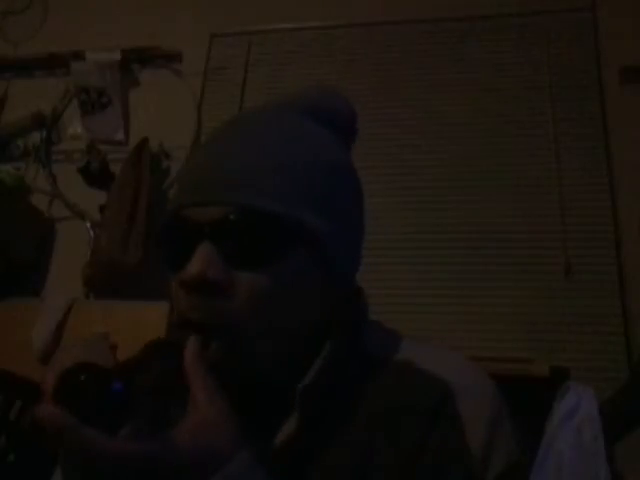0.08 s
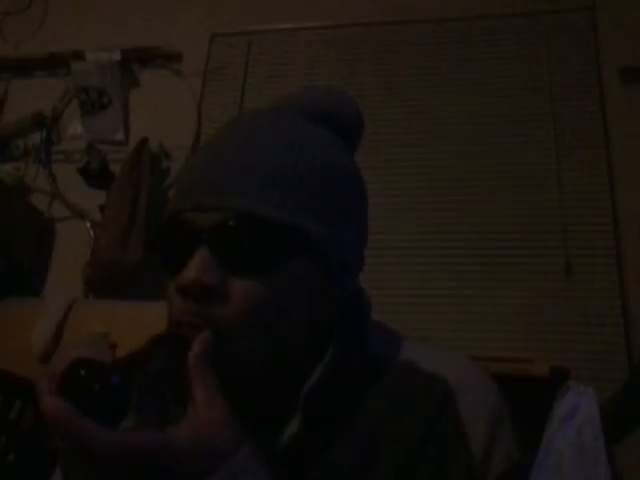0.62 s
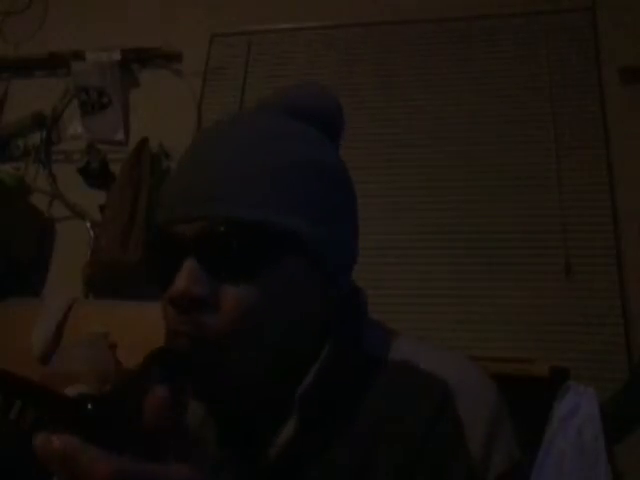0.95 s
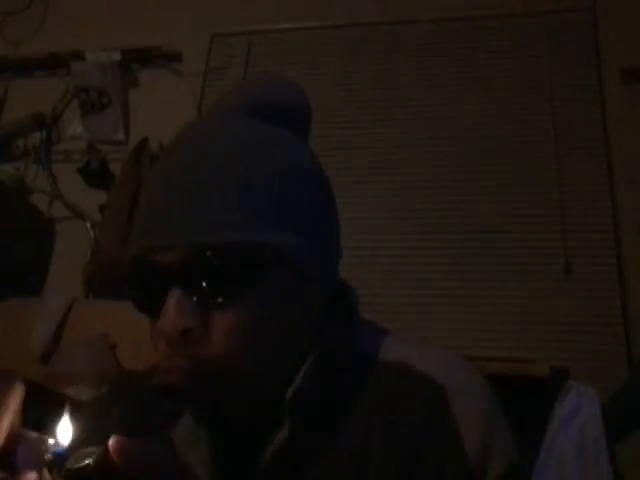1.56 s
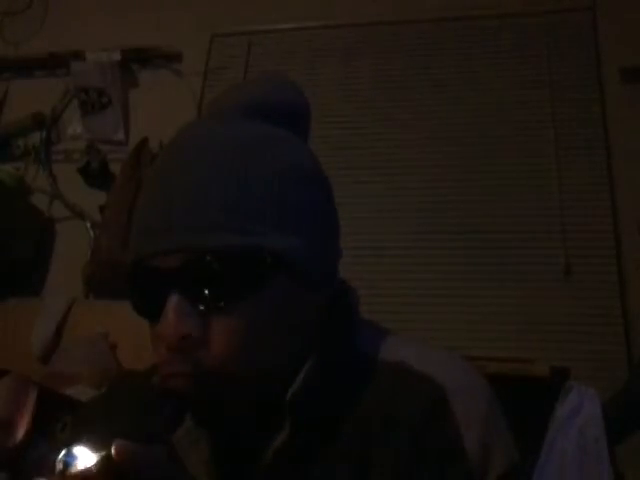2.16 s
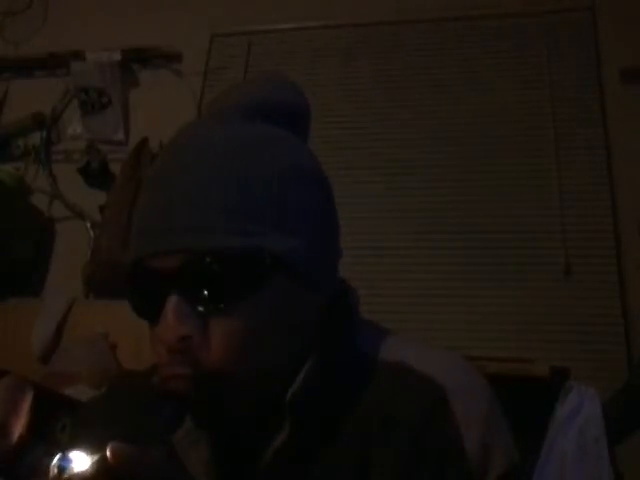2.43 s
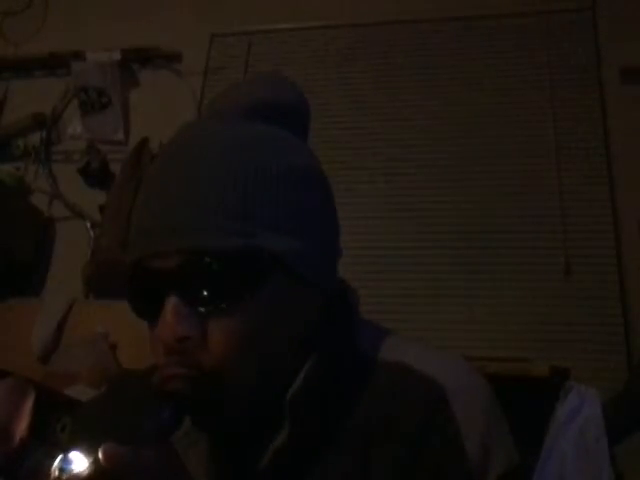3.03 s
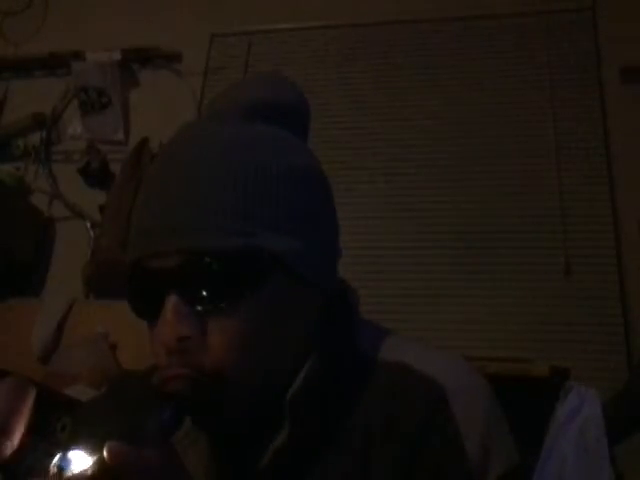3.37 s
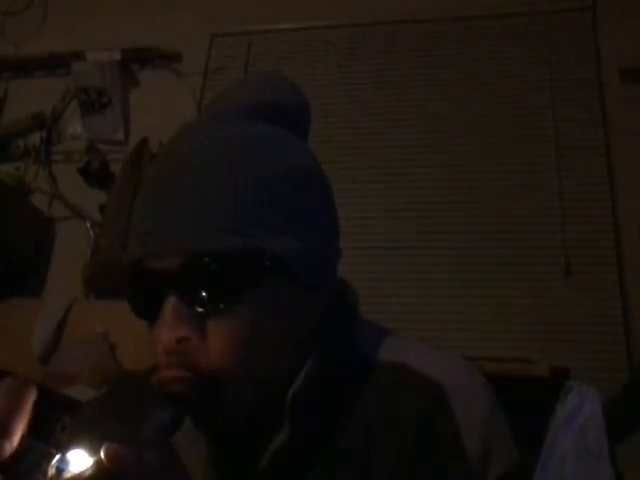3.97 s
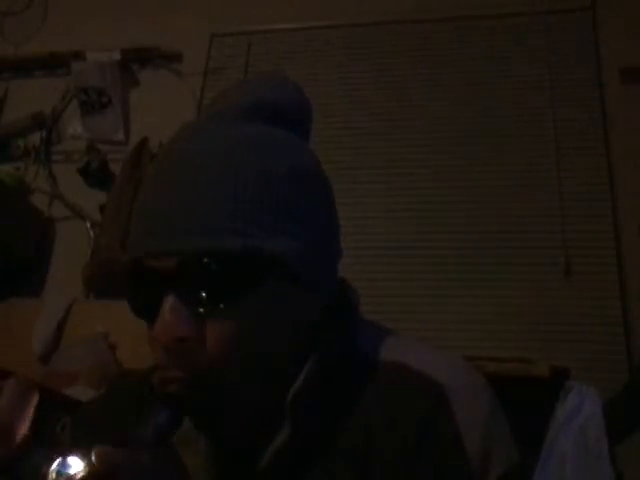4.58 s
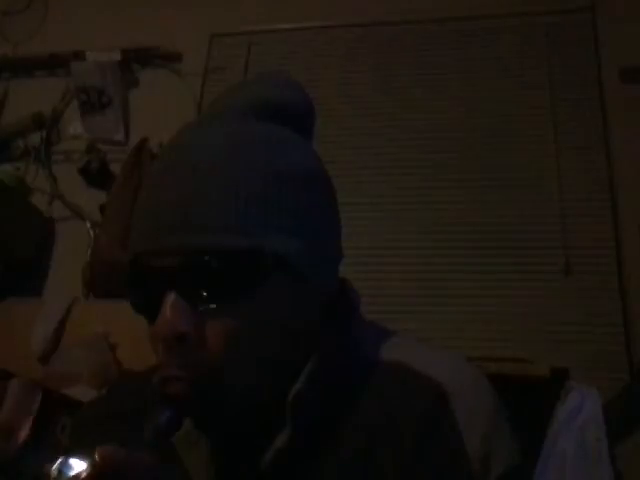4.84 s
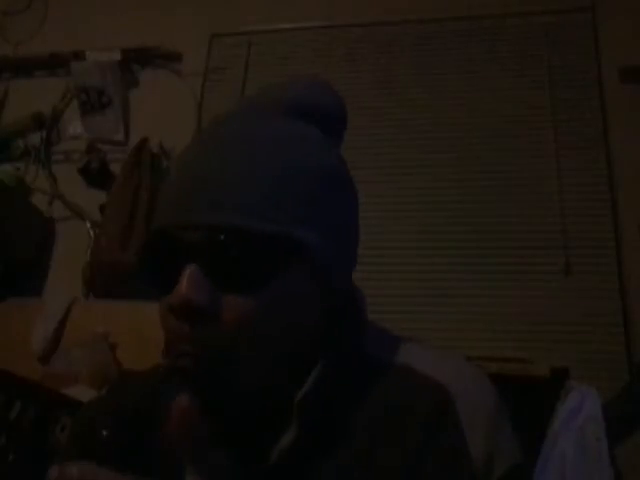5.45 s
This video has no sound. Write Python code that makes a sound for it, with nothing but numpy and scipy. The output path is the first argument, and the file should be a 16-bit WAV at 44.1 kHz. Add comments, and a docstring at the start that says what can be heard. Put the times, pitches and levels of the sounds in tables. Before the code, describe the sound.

Close by, one flint lighter strike is followed by a bright, growing crackle of a burning pipe over faint room rumble.

```python
"""In a small quiet room, someone lights a pipe. A flint wheel rasps, the lighter clicks, and the
gas catches with a puff and rushes into the bowl. Air squeaks in the mouthpiece, then the filling
sizzles and pops ever harder as tiny pockets of moisture burst. Fingers tap, a sleeve rustles and the
room rumbles faintly. Two small microphone ports listen close by; the right one rings in the treble."""
import sys
import numpy as np
from scipy import signal
from scipy.fft import rfft, irfft, next_fast_len
from scipy.io import wavfile
from scipy.ndimage import map_coordinates

SR = 44100
rng = np.random.default_rng(int(sys.argv[2]) if len(sys.argv) > 2 else 0)


def to_wav(s):
    """Save 16-bit WAV."""
    ch = np.atleast_2d(s).T  # columns
    pcm = np.round(np.clip(ch, -1, 1) * 32767)  # PCM
    wavfile.write(sys.argv[1], SR, pcm.astype(np.int16))


N = 247401


# the loudest pops of the burning filling: (time [s], level [dB], added level for the body [dB])
LOUD_POPS = [(2.0106, -30, -6.5), (2.4542, -24.5, -8), (2.4794, -22.5, -9.5), (2.6282, -18.5, -11.5),
             (2.6979, -21.5, -5.5), (2.7807, -20, -3), (2.8202, -24, -8), (2.9815, -13.5, -23),
             (2.997, -14.5, -9), (3.112, -15.5, -2), (3.1367, -22.5, -8.5), (3.2122, -14, 0),
             (3.4053, -18, -10), (3.4929, -20, -17), (3.5278, -16, -23), (3.6288, -17, -11),
             (3.7913, -14.5, -17.5), (3.8232, -14, -12.5), (3.8694, -8, -15), (3.9587, -15, -12),
             (4.0046, -14, -40), (4.048, -16.5, -8), (4.0677, -12.5, -8.5), (4.0968, -15, -14),
             (4.1225, -16, -32), (4.1447, -12, -28), (4.1727, -19.5, -6), (4.2348, -11, -14.5),
             (4.277, -19.5, -4), (4.3354, -13, -17), (4.3767, -8.5, -39), (4.448, -11.5, -16),
             (4.4784, -23.5, -1.5), (4.582, -13.5, -23), (4.6041, -10, -26), (4.6195, -18, -32),
             (4.64, -1.5, -26), (4.6562, -7, -16), (4.6724, -16, -19), (4.6896, -25, -11),
             (4.7105, -15.5, -8), (4.7438, -20, -4), (4.749, -21.5, 3), (4.7728, -9.5, 0),
             (4.7842, 0.5, -33), (4.8077, -20, -3), (4.8244, -13, -0.5), (4.8566, -8.5, -19),
             (4.899, -14.5, -8.5), (4.9859, -28, -1), (5.0137, -19.5, -40), (5.0594, -19, -30),
             (5.0731, -12.5, -16), (5.1019, -16, -36), (5.1211, -13.5, -42), (5.1796, -11.5, -38),
             (5.217, -15, -35), (5.33, -17, -42), (5.3788, -2, -40), (5.3883, -13, -40),
             (5.4408, -7.5, -39), (5.4423, -8, -52), (5.4503, -7.5, -45), (5.4737, -5.5, -53),
             (5.5141, -12.5, -17), (5.536, -10, -51)]
# a bright snap's colour, or how strong each frequency is: (frequency [Hz], level [dB])
SNAP_COLOUR = [(100, -15.5), (900, -22), (2000, -15), (3000, -3), (4200, -2.5), (6200, 4), (7300, 1.5),
               (8500, -9.5), (10500, -29.5), (12500, -23), (15000, -29.5)]
# the duller body of a pop: (frequency [Hz], level [dB])
BODY_COLOUR = [(100, -47), (600, -8), (1200, -1), (1900, 1.5), (3000, 7), (4500, 7), (7000, 4),
               (15000, -60)]
def pops(snap_db=-11, body_db=-1, ring_db=-3, ring_hz=3400, splutter_db=-21):
    """Pockets of moisture burst: a snap, a duller body with its own pitch, and a brief splutter."""
    times, db, low_db = np.vstack([LOUD_POPS, small_pops()]).T
    snaps = kicks_at(times, amp(db + snap_db))
    splutter = amp(splutter_db) * fading(snaps, seconds=.0013) * grains(rate=6000, spread_db=2)
    body = struck(kicks_at(times, amp(db + low_db + body_db)), BODY_COLOUR)
    pitch = ring_hz * 2 ** (rng.random(len(times)) - .5)
    ring = rings(times, amp(db + low_db + ring_db), pitch, cycles=0.76)
    return struck(snaps + splutter, SNAP_COLOUR) + body + ring


def small_pops(over_burn_db=14, spread_db=5, moist_body_db=-14, dry_body_db=-32, count=90):
    """Random rows like LOUD_POPS, most where the burn is strong; drying takes their body away."""
    burn_db = burn()
    when, strength, body = rng.random((count, 3)).T
    chance = np.cumsum(amp(burn_db / 2))
    samples = np.searchsorted(chance / chance[-1], (np.arange(count) + when) / count)
    times = samples / SR
    db = burn_db[samples] + over_burn_db + spread_db * (2 * strength - 1)
    low_db = moist_body_db + (dry_body_db - moist_body_db) * dryness(times)
    return np.column_stack([times, db, low_db + spread_db * (2 * body - 1)])


def sizzle(fizz_db=-15, tick_db=-15.5, flurry_db=1.5, count=3200, moist_hz=4070, dry_hz=6100):
    """Countless tiny bursts fizz and tick with the burn; the ticks get higher once the filling dries."""
    fizz = grains(rate=1000, spread_db=5)
    when, strength, cavity = rng.random((count, 3)).T
    times = when * N / SR
    pitch = (moist_hz + (dry_hz - moist_hz) * dryness(times)) * 2 ** (cavity - .5)
    ticks = rings(times, amp(-20 * strength), pitch, cycles=0.56)
    # bursts this small give off little bass, so both take the colour of a snap
    crackle = amp(fizz_db) * unit(struck(fizz, SNAP_COLOUR))
    crackle += amp(tick_db) * unit(struck(ticks, SNAP_COLOUR))
    return amp(burn() + flurry_db * wobble(35)) * crackle


# how hard the filling burns: (time [s], level [dB])
BURN_LEVELS = [(1.3, -79), (2.05, -55), (2.92, -49.5), (3.38, -47.5), (3.72, -40), (4.3, -40), (4.9, -37),
               (5.2, -38.5), (5.45, -43.5), (5.61, -62)]
# fresh patches catch and flare up: (time [s], length [s], boost [dB])
FLARE_UPS = [(2.357, .12, 3.5), (2.682, .12, 6), (3.195, .08, 7), (4.4, .09, 5.5), (4.657, .16, 8)]
def burn(rise_s=.015, fall_s=0.055):
    """The strength of the burn in dB: it builds slowly, flares now and then, and dies down."""
    steady_db, = curves(BURN_LEVELS)
    return steady_db + sum(db * swell(start, length, rise_s, fall_s) for start, length, db in FLARE_UPS)


def dryness(times, dry_at_s=4.9, drying_s=0.043):
    """0 while the filling is moist, 1 once it has dried."""
    return (1 + np.tanh((times - dry_at_s) / drying_s)) / 2


# wetter pockets in the filling: (time [s], length [s], level [dB])
WET_POCKETS = [(2.446, 0.0014, -51), (2.7806, 0.0012, -39), (2.82, 0.0015, -36.5), (2.829, 0.0012, -43),
               (2.987, 0.0135, -41), (3.2128, .003, -37), (3.4953, 0.0057, -40), (4.076, 0.0047, -38),
               (4.689, 0.0046, -32.5)]
def splutters(body_db=2, edge_s=0.0013):
    """A wet pocket bursts in a quick run of tiny pops, part snap and part body."""
    level = sum(amp(db) * swell(start, length, edge_s, edge_s) for start, length, db in WET_POCKETS)
    bursts = grains(rate=4000, spread_db=2)
    snap = unit(struck(bursts, SNAP_COLOUR))
    body = amp(body_db) * unit(struck(bursts, BODY_COLOUR))
    return level * unit(snap + body)


# the thumb pushes the wheel, first a slip, then a full spin: (time of top speed [s], level [dB])
WHEEL_SPINS = [(1.138, -56), (1.186, -32)]
# the wheel and lever snap home, and at last the lever is let go: (time [s], level [dB])
LIGHTER_CLICKS = [(1.1825, -9), (1.1839, -7), (1.1871, -15.5), (1.1979, -22), (5.5165, -36)]
# the colour of the lighter's rasp and clicks: (frequency [Hz], level [dB])
FLINT_COLOUR = [(60, -55.5), (450, -22), (900, -17.5), (1500, -14.5), (2200, -8), (3400, -5), (5300, 1.5),
                (6500, -3.5), (8500, -6), (10500, -20.5), (13500, -9.5), (15800, -14.5)]
def lighter(click_db=-2, chatter_db=-9, chatter_s=0.00087, rise_db_per_s=854.5, fall_db_per_s=750.5):
    """The wheel's teeth rasp over the flint, harder and harder, until the thumb lands on the lever."""
    t = np.arange(N) / SR
    grip = sum(amp(db + np.minimum(rise_db_per_s * (t - fastest), fall_db_per_s * (fastest - t)))
               for fastest, db in WHEEL_SPINS)
    teeth = unit(struck(grains(rate=7000, spread_db=3), FLINT_COLOUR))
    times, db = np.transpose(LIGHTER_CLICKS)
    clicks = kicks_at(times, amp(db + click_db))
    chatter = amp(chatter_db) * fading(clicks, chatter_s) * rng.choice([-1, 1], N)
    return grip * teeth + struck(clicks + chatter, FLINT_COLOUR) + hood(clicks)


def hood(clicks, pitch_hz=5410, level_db=-19.5, decay_s=.003):
    """The lighter's thin steel hood rings briefly after each click."""
    t = np.arange(SR // 10) / SR
    ring = np.sin(2 * np.pi * pitch_hz * t) * np.exp(-t / decay_s)
    return amp(level_db) * signal.fftconvolve(clicks, ring)[:N]


# the low rush of the flame: (frequency [Hz], level [dB])
RUSH_COLOUR = [(20, -47), (90, -26), (150, 2), (250, 0), (500, -6), (1000, -9.5), (2500, -10), (8000, -47)]
# the high hiss of the gas jet: (frequency [Hz], level [dB])
JET_COLOUR = [(3000, -38), (6500, -3), (8000, 1), (9200, -7.5), (10500, -4.5), (14500, -9)]
def flame(lit_s=1.183, puff_db=-51, idle_db=-69, draw_db=-54, build_s=6.95, jet_db=-3.5):
    """The gas lights with a puff, then rushes and hisses ever more as it is pulled into the bowl."""
    age = np.maximum(np.arange(N) / SR - lit_s, 0)
    puff = amp(puff_db) * swell(lit_s, hold_s=0.022, rise_s=0.036, fall_s=0.084)
    rush = amp(idle_db) * (age > 0) + amp(draw_db) * (1 - np.exp(-age / build_s))
    return np.array([(puff + rush) * noise(RUSH_COLOUR) + amp(jet_db) * rush * noise(JET_COLOUR)
                     for port in range(2)])


# squeaks in the mouthpiece:
# (time [s], length [s], level [dB], first pitch [Hz], top pitch [Hz], time to climb [s])
AIR_SQUEAKS = [(1.694, 0.022, -60, 2850, 3450, 0.0093), (1.777, 0.047, -54, 2870, 3225, 0.047)]
# the tones that make up a squeak: (multiple of the pitch [x], level [dB])
SQUEAK_TONES = [(1, -7), (2, -8)]
def squeaks(rasp_db=-10, edge_s=0.029, sag_hz_per_s=13000, flutter_s=0.013, flutter_db=1.5):
    """Air slips through a narrow gap at the mouthpiece and sings; the pitch climbs, then sags."""
    t, out = np.arange(N) / SR, np.zeros(N)
    for start, length, db, first_hz, top_hz, climb_s in AIR_SQUEAKS:
        since_top = t - start - climb_s
        hz = top_hz + np.minimum((top_hz - first_hz) * since_top / climb_s, -sag_hz_per_s * since_top)
        phase = 2 * np.pi * np.cumsum(hz * (1 + .018 * wobble(900))) / SR
        tone = sum(amp(level + 3.7 * wobble(120)) * np.sin(k * phase) for k, level in SQUEAK_TONES)
        # near the top pitch, every other cycle weakens
        flutter = amp(flutter_db) * np.exp(-(since_top / flutter_s) ** 2)
        tone = tone * (1 + flutter * np.cos(phase / 2)) + amp(rasp_db) * noise(SNAP_COLOUR)
        out += tone * amp(db) * swell(start, length, edge_s, edge_s)
    return out


# light touches on the pipe and lighter: (time [s], level [dB])
FINGER_TAPS = [(0.03, -37), (0.066, -36), (1.467, -49), (1.716, -44), (1.74, -48), (1.778, -45),
               (1.831, -36)]
def taps(level_db=-10):
    """Fingers make small soft scuffs as the hands settle."""
    times, db = np.transpose(FINGER_TAPS)
    return fading(kicks_at(times, amp(db + level_db)), seconds=.002) * noise(SNAP_COLOUR)


# the colour of brushing cloth: (frequency [Hz], level [dB])
CLOTH_COLOUR = [(40, -1), (150, 9), (500, 5.5), (1200, -2), (2600, -2.5), (4000, -8), (6000, -7),
                (9000, -8.5), (15000, -18.5)]
def sleeve(level_db=-58):
    """A sleeve brushes softly and comes to rest."""
    return amp(level_db) * swell(0, hold_s=0.029, rise_s=0.029, fall_s=0.17) * noise(CLOTH_COLOUR)


# the colour of the room's rumble: (frequency [Hz], level [dB])
RUMBLE_COLOUR = [(20, -7.5), (60, -7.5), (120, -1), (170, -8.5), (250, -11), (500, -18), (1000, -21),
                 (2300, -36), (3700, -36.5), (5600, -31.5), (9000, -28)]
# how the rumble wavers: (time [s], level change [dB])
RUMBLE_DRIFT = [(0, 4), (2.6, 1.5), (3.7, 2), (4.7, -1.5), (5.61, 3.5)]
def room_tone(shared_db=-63, separate_db=-65, alike_hz=600):
    """The room rumbles faintly; only its long, low waves are alike at both ports."""
    drift_db, = curves(RUMBLE_DRIFT)
    shared = filtered(noise(RUMBLE_COLOUR), lambda hz: 1 / (1 + (hz / alike_hz) ** 2))
    separate = np.array([noise(RUMBLE_COLOUR), noise(RUMBLE_COLOUR)])
    return amp(drift_db) * (amp(shared_db) * shared + amp(separate_db) * separate)


# how long the room's echo lasts: (frequency [Hz], time to fade by 60 dB [s])
ECHO_TIMES = [(200, .3), (1500, .28), (5000, .29), (14000, .24)]
def room(x, onset_s=0.00088):
    """The walls send a short wash of echoes to each port; the highest treble dies first."""
    hz, t, spectrum = signal.stft(rng.standard_normal((2, SR // 2)), SR, nperseg=256)
    fade = amp(-60 * t / along(ECHO_TIMES, hz)[:, None])
    tail = signal.istft(spectrum * fade, SR, nperseg=256)[1]
    tail *= 1 - np.exp(-np.arange(tail.shape[1]) / SR / onset_s)
    return signal.fftconvolve(x[None], tail / np.linalg.norm(tail[0]), axes=1)[:, :N]


def amp(db):
    """Turns decibels into a number to multiply by."""
    return 10 ** (np.asarray(db) / 20)


def unit(x):
    """Scales x to an average strength (rms) of 1."""
    return x / np.sqrt(np.mean(x ** 2) + 1e-20)


def along(points, hz):
    """Reads between the rows of a frequency table, with octaves evenly spaced."""
    frequencies, values = np.transpose(points)
    return np.interp(np.log(hz + 1), np.log(frequencies), values)


def curves(rows):
    """One value per sample for each column after the time."""
    times, *columns = np.transpose(rows)
    return [np.interp(np.arange(N) / SR, times, column) for column in columns]


def wobble(rate):
    """A smooth curve through `rate` random points a second."""
    return map_coordinates(rng.standard_normal(int(N * rate / SR) + 4), [np.arange(N) * rate / SR])


def swell(start, hold_s, rise_s, fall_s):
    """A loudness curve that reaches 1 at start, holds, and falls back to 0."""
    t = np.arange(N) / SR - start
    return np.clip(np.minimum(1 + t / rise_s, 1 - (t - hold_s) / fall_s), 0, 1)


def fading(kicks, seconds):
    """A loudness curve that dies away after each kick."""
    return signal.lfilter([1], [1, -np.exp(-1 / (seconds * SR))], kicks)


def filtered(x, response):
    """Multiplies each frequency in x by response(hz)."""
    size = next_fast_len(N + SR // 2)
    return irfft(rfft(x, size) * response(np.fft.rfftfreq(size, 1 / SR)), size)[..., :N]


def delayed(x, seconds):
    """x arriving later."""
    return filtered(x, lambda hz: np.exp(-2j * np.pi * hz * seconds))


def noise(colour):
    """Noise of this colour, at strength 1."""
    return unit(filtered(rng.standard_normal(N), lambda hz: amp(along(colour, hz))))


def pulse(colour, size=1024):
    """The shortest click that has this colour."""
    cepstrum = irfft(np.log(amp(along(colour, np.fft.rfftfreq(size, 1 / SR)))))
    # folding the second half onto the first packs the energy at the start
    cepstrum[1:size // 2] *= 2
    cepstrum[size // 2 + 1:] = 0
    return irfft(np.exp(rfft(cepstrum)))


def struck(kicks, colour):
    """Every kick becomes a coloured click of the same height."""
    shape = pulse(colour)
    return signal.fftconvolve(kicks, shape / np.abs(shape).max())[:N]


def kicks_at(times, sizes):
    """Kicks, spikes one sample long, at the given times."""
    return np.bincount(np.round(np.asarray(times) * SR).astype(int), sizes, N)[:N]


def grains(rate, spread_db):
    """Uneven kicks at random moments, about `rate` a second, at strength 1."""
    size = amp(spread_db * np.clip(rng.standard_normal(N), -2, 2))
    return unit((rng.random(N) < rate / SR) * size * rng.choice([-1, 1], N))


def rings(times, sizes, hz, cycles, size=256):
    """Each burst rings its own small hollow for a few cycles."""
    turns = hz[:, None] * np.arange(size) / SR
    envelope = np.exp(-turns / cycles) * (1 - np.exp(-2 * turns))
    waves = sizes[:, None] * np.sin(2 * np.pi * turns) * envelope
    where = np.round(times * SR).astype(int)[:, None] + np.arange(size)
    return np.bincount(where.ravel(), waves.ravel(), N)[:N]


def gain_control(x, limit_db=-5, release_db_per_s=45, attack_s=0.021):
    """A peak over the limit pulls the volume down a moment later; it then creeps back."""
    over_db = np.maximum(20 * np.log10(np.abs(x).max(0) + 1e-9) - limit_db, 0)
    ramp_db = release_db_per_s * np.arange(N) / SR
    held_db = np.maximum.accumulate(over_db + ramp_db) - ramp_db
    return x * amp(-fading(held_db, attack_s) / (attack_s * SR))


# how strongly the lighter throws its sound out into the room: (frequency [Hz], boost [dB])
LIGHTER_THROW = [(1000, 11.5), (4000, 4.5), (5500, 3.5), (10000, 11), (14000, 3)]
def scene(lighter_echo_db=-7, pipe_echo_db=-9, right_echo_db=-5, pipe_left_db=-1.5, wall_bounce=0.046):
    """The pipe is nearer the right port; the left one also hears a faint echo off a nearby wall about a
    millisecond later."""
    strike = lighter()
    pipe = pops() + splutters() + sizzle() + taps() + sleeve() + squeaks()
    far = strike + amp(pipe_left_db) * pipe
    left = delayed(far, seconds=.00014) + wall_bounce * delayed(far, seconds=.00111)
    thrown = filtered(strike, lambda hz: amp(along(LIGHTER_THROW, hz)))
    walls = room(amp(lighter_echo_db) * thrown) + room(amp(pipe_echo_db) * pipe)
    return np.array([left, strike + pipe]) + walls * amp([[0], [right_echo_db]]) + flame() + room_tone()


# the treble ring of the right microphone port: (frequency [Hz], level change [dB])
PORT_COLOUR = [(50, 1.5), (130, -6), (500, -2.5), (2200, -4.5), (3000, -2), (4200, 7), (4700, 9.5),
               (5250, 13), (5700, 16), (6050, 10), (6500, 1.5), (7200, 1), (9200, 2), (14000, 2.5)]
# the hiss of the microphones' amplifiers: (frequency [Hz], level [dB])
HISS_COLOUR = [(20, -21), (3000, 12), (14500, -25)]
def record(dry, hiss_db=-71.0, top_hz=14800):
    """The right port rings and its wave is flipped; the amplifiers hiss, dip after peaks and clip."""
    right = -signal.fftconvolve(dry[1], pulse(PORT_COLOUR))[:N]
    hiss = amp(hiss_db) * np.array([noise(HISS_COLOUR), noise(HISS_COLOUR)])
    clipped = np.clip(gain_control(np.array([dry[0], right]) + hiss), -1, 1)
    return filtered(clipped, lambda hz: hz < top_hz)


dry = scene()
out = record(dry)
to_wav(out)
```